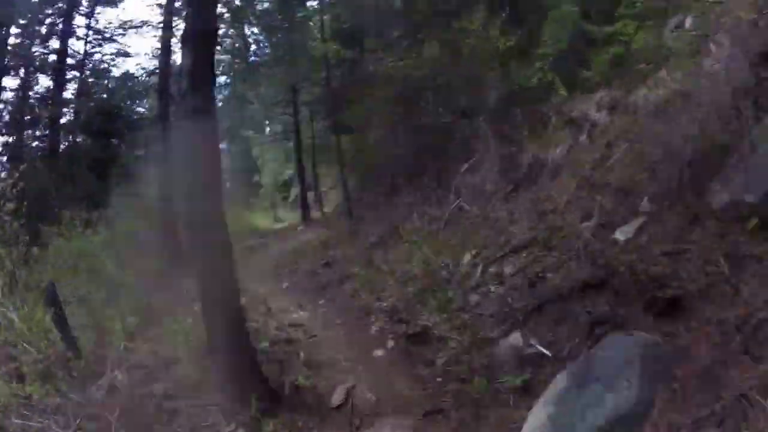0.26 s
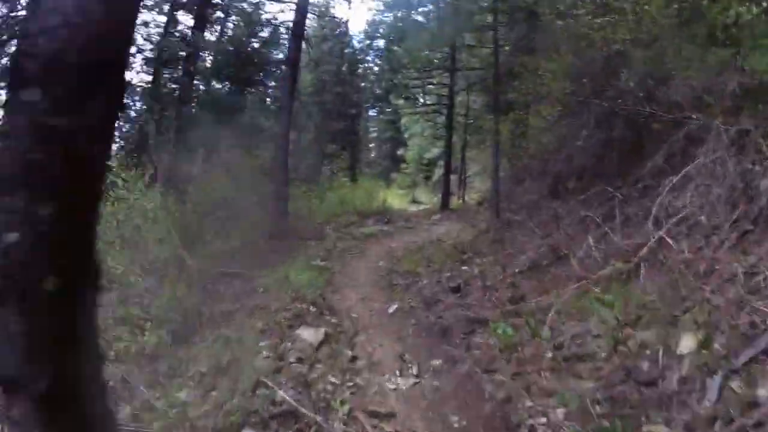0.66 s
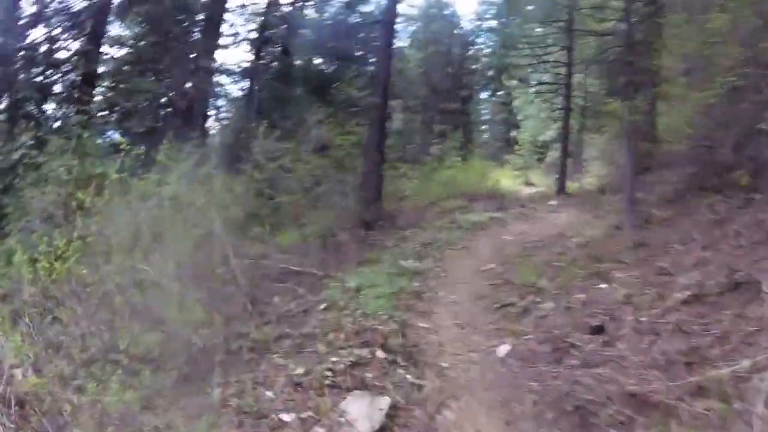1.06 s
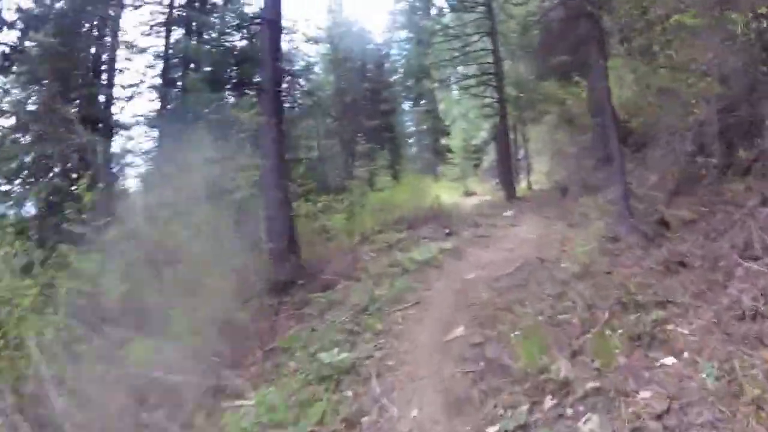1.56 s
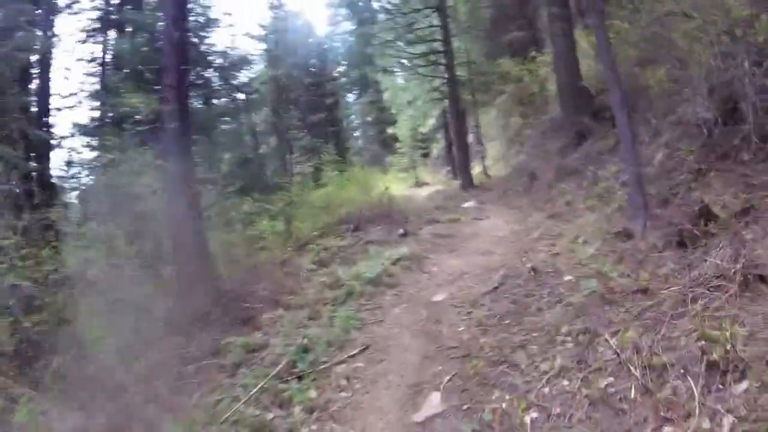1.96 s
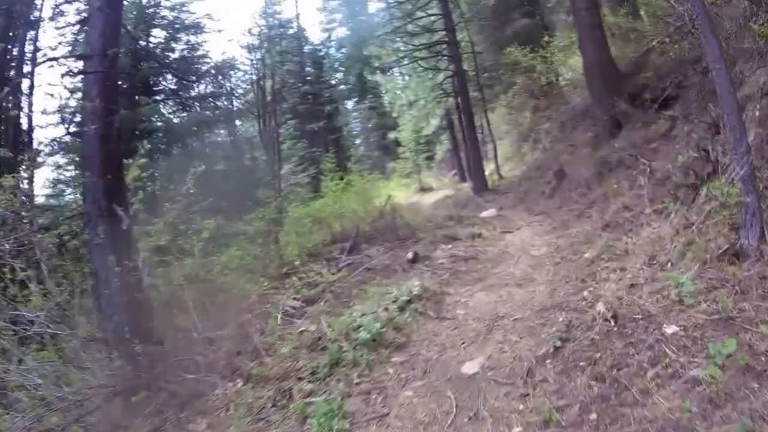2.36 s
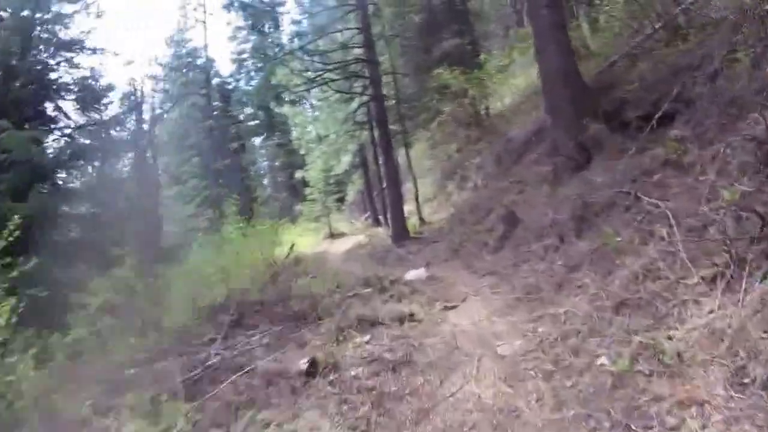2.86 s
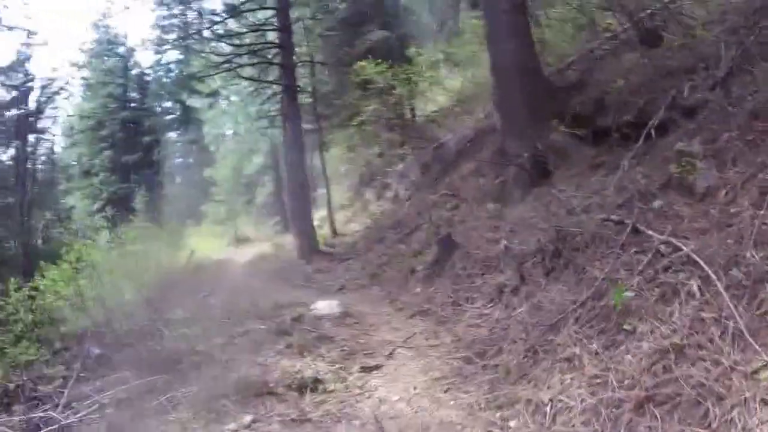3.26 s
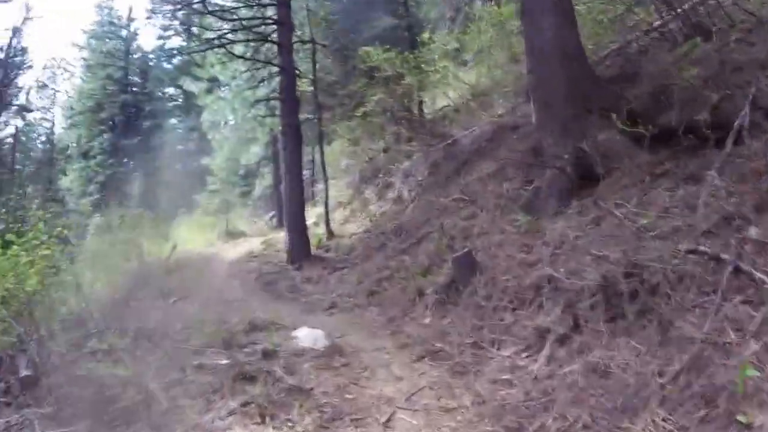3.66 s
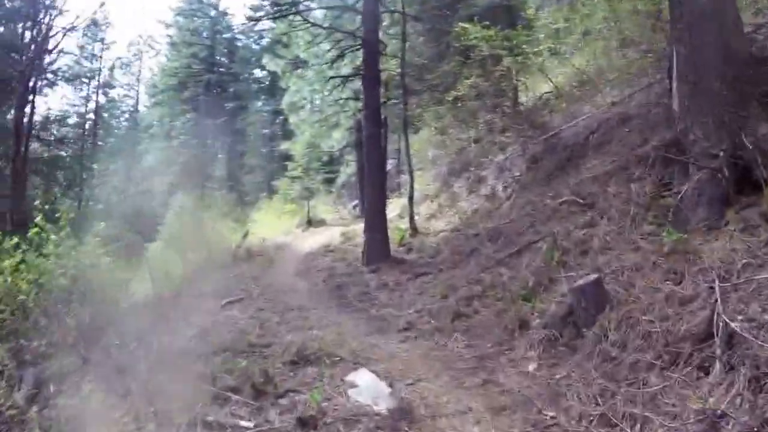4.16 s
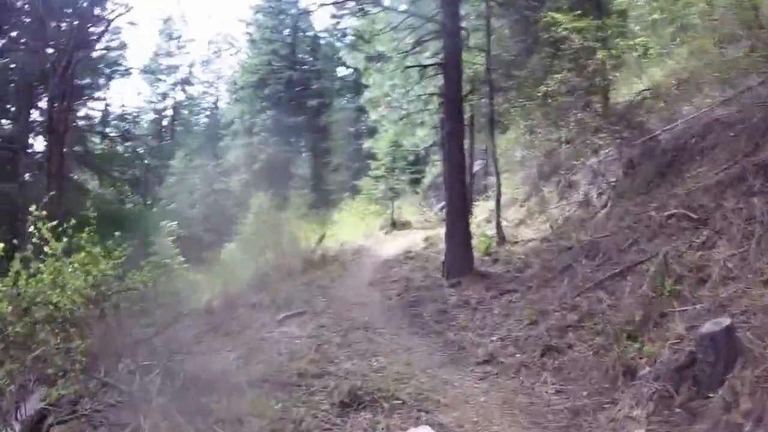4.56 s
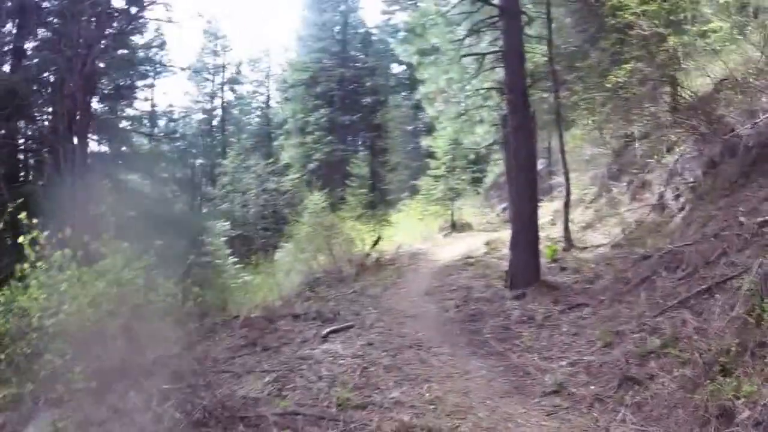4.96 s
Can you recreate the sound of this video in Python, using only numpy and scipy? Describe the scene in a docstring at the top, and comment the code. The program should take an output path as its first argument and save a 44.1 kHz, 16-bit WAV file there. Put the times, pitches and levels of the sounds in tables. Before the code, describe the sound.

A mountain bike races down rough dirt, heard from inside a sealed plastic camera case. Heavy low wheel thumps and rumble open the ride, then irregular hollow clacks and sharp ticks take over, crowding close together. Loose parts patter constantly between them. The sound is very close, dry and muffled on top, with the hardest knocks overloading the microphone.

```python
"""A rough forest trail, heard from a mountain bike by a camera's microphone inside a sealed plastic case.
Closest are the jolts on the case: bright ticks and a hollow shell ring, made by noise ringing resonances.
Loose parts patter on the case between them; farther off, tyre rumble (filtered noise) and
wheel thumps (short low swings) come up through the frame, under a faint treble hiss.
The case dulls the treble, and the hardest knocks overload the microphone."""
import sys
import numpy as np
from scipy import signal
from scipy.io import wavfile
from scipy.ndimage import uniform_filter1d

SR = 44100
rng = np.random.default_rng(int(sys.argv[2]) if len(sys.argv) > 2 else 0)


def bounce(signal):
    """Save signal as a 16-bit WAV file at the path given by the first command-line argument."""
    frames = np.transpose(np.atleast_2d(signal))
    limited = np.clip(frames, -1, 1)
    pcm = np.round(limited * 32767).astype(np.int16)
    wavfile.write(sys.argv[1], SR, pcm)


N = 229653  # length [samples]

# roughness along the trail: (time [s], rattle level [dB], rumble level [dB])
TRAIL_ROUGHNESS = [(0.0, -24, -11), (0.131, -35, -22), (.35, -23, -23), (0.901, -19, -25),
                   (1.351, -20.5, -26), (1.75, -18.5, -30.5), (2.602, -19.5, -28.5), (3.5, -18.5, -27.5),
                   (4.0, -19, -29), (4.45, -18.5, -34.5), (5.05, -17.5, -31), (5.21, -21, -28)]
# wheel strikes heard through the frame: (time [s], level [dB], pitch [Hz], top of the swing [cycles])
WHEEL_THUMPS = [(.004, -5.5, 86, .75), (0.069, -6, 85.2, 1.7), (0.085, -5, 188, 0.99),
                (0.101, -7.5, 87.5, 0.77), (.3, 0.5, 170, 0.39), (0.335, -4, 95, .34),
                (1.019, -12, 205, 1.5), (1.312, -18, 75, 1), (1.892, -9.5, 238, 0.68),
                (2.158, -22.5, 109, 0.84), (3.49, -16.5, 130, 1.8), (4.899, -13.5, 140, 0.8)]
# jolts on the case: (time [s], tap level [dB], shell ring level [dB], ring length scale [ms])
CASE_JOLTS = [(0.017, -34.5, 4.5, 3.2), (0.063, -10.5, -10.5, 5.4), (0.089, -7.5, 7, 3.3),
              (0.171, -21.5, -20, 4), (0.223, -9, -1.5, 9.8), (.290, -9.5, -5, 4), (.304, -8, 6.5, 3.7),
              (0.312, -16, -12, 8.4), (0.415, -10.5, -10, 10), (.442, -7.5, 2, 3.8),
              (0.48, -25.5, -13, 4.4), (0.498, -2.5, 0, 8.3), (.543, -6.5, -3.5, 8.4),
              (.627, -11, -2.5, 5.7), (.720, -10.5, 9, 2.86), (.762, 1, 2.5, 11.3), (.820, 0, 8.5, 6.1),
              (0.834, -4, 2, 7.6), (0.992, -5, -7, 5.4), (1.006, 3.5, 3, 17), (1.022, -1, 6.5, 7.2),
              (1.037, 1.5, 5.5, 8.6), (1.069, 0.5, 6, 4.5), (1.082, -21, -2.5, 7.7), (1.131, -5, 4, 6.9),
              (1.174, -20, 3, 2.3), (1.284, -6, 9, 2.35), (1.322, -6.5, 0.5, 10.5), (1.365, -2.5, 4, 7.7),
              (1.409, -7.5, -12, 3.5), (1.451, -6.5, 1, 4.5), (1.503, 1, 4, 9.1), (1.543, -13, -3, 14),
              (1.569, -6.5, 8, 3.9), (1.694, -7, -3.5, 5), (1.721, -8, -1, 13), (1.748, -1, 6.5, 7.1),
              (1.865, -5.5, -2, 5.6), (1.892, 0, 11.5, 6.9), (1.907, -2.5, 0, 5.3), (2.045, -3.5, 4, 4.2),
              (2.122, -14, -0.5, 5.5), (2.16, -0.5, 8.5, 5), (2.194, -5, 2.5, 5.2), (2.243, -9, -16, 3.3),
              (2.282, -6.5, -8, 3.9), (2.341, -1, 1.5, 3.1), (2.355, 2, 2.5, 7.9), (2.374, -6.5, -3, 7.1),
              (2.468, -2.5, 11, 7.3), (2.498, -5, 1, 3.7), (2.521, -5.5, -5, 15), (2.531, -10.5, 1, 5.1),
              (2.585, -9, 7.5, 3.7), (2.745, -0.5, -1, 8.5), (2.774, -2, 6, 6.7), (2.811, -7, 0, 7.3),
              (2.837, -5, -1.5, 3.7), (2.896, -5, -20, 2.9), (2.966, -11.5, -9, 3.7),
              (3.088, -9, -0.5, 9.5), (3.121, -7, -4, 8.3), (3.182, -9.5, -1, 1.9), (3.249, -5, 0, 3.5),
              (3.271, -3, -8, 7.1), (3.369, 0, 6, 4), (3.55, -6.5, -11, 7.5), (3.566, -1, -0.5, 9.6),
              (3.590, 3, 1.5, 12.5), (3.606, -0.5, 2, 8.5), (3.69, -3, 5, 3.2), (3.713, -0.5, 7, 7.7),
              (3.843, -8.5, -22, 3), (3.901, -9, -4.5, 7), (3.946, -18, -2.5, 4.5),
              (4.028, -9.5, -3.5, 19.6), (4.130, -5, 0, 5), (4.213, 1, 2, 8.6), (4.228, -1, -0.5, 3.9),
              (4.257, -5.5, -18, 5), (4.285, -7.5, -13, 3.9), (4.323, -10.5, 4.5, 6.5),
              (4.386, -13, -5, 11), (4.409, -11, -5.5, 5), (4.433, -3.5, 6.5, 3.3), (4.460, -4, -8.5, 5),
              (4.648, -14, -1, 4.7), (4.725, -11, -4, 11), (4.791, -3.5, 7.5, 7.4), (4.898, 2, 2.5, 2.3),
              (4.908, -26, 12, 1.8), (4.936, -4.5, 5, 3.5), (4.964, -3, -2, 4), (4.995, -3.5, -4, 5.7),
              (5.038, -6.5, -3, 4.4), (5.075, -4.5, .5, 10), (5.114, -5.5, -2, 7.8), (5.154, -5, 1.5, 20.6),
              (5.182, -9.5, 5.5, 4.7)]
# hollow low resonances of the case shell: (frequency [Hz], width [Hz], level [dB])
SHELL_MODES = [(268.7, 31.6, -9), (361.9, 48, 3), (390.9, 55, 2.5), (466.7, 54.2, 5), (516.7, 68, 1.5),
               (579, 77, -5), (814, 32, -15.5)]
# middle resonances of the case: (frequency [Hz], width [Hz], level [dB])
CLACK_MODES = [(832, 147, -7.5), (1251, 168, 3), (1386, 460, -1.5), (1638, 220, -1.5)]
# bright upper resonances of the case: (frequency [Hz], width [Hz], level [dB])
TICK_MODES = [(2040, 155, -2.5), (2265, 142, 3.5), (2712, 136, 4.5), (3410, 486, -7), (4250, 950, -18.5),
              (5800, 210, -28.5)]
# low resonances of the bike frame: (frequency [Hz], width [Hz], level [dB])
FRAME_MODES = [(82, 22, -6), (136.8, 11, -9.5), (215, 190, -21)]
# narrow bands of the treble hiss: (frequency [Hz], width [Hz], level [dB])
HISS_BANDS = [(4480, 330, -0.5), (5800, 350, 4.5)]

RATTLE_BRIGHT_DB, BRIGHT_PER_DB = 3, 0.37  # upper modes on a -19 dB stretch; rougher ground is brighter
SHELL_START_S = -.0008  # start of the shell's swell, from the jolt's time
TAP_START_S = -.001  # start of a tap, from its given time
TICK_SPREAD_DB = 4  # taps fall at random nearer the middle or the upper modes
THIN_DB = -20.5  # brief ticks of the highest modes alone, against their tap
REBOUND_DB, REBOUND_SPREAD_DB = -6.5, 3  # the camera shuffles around each tap
REBOUND_MS, REBOUND_SCATTER_MS = 5.5, 9
STRAY_COUNT, STRAY_DB, STRAY_SPREAD_DB = 70, 7.5, 3  # small stray taps, level above the rattle
CASE_HZ, BASS_CUT_HZ, TOP_HZ = 4000., 60., 15800  # treble limit of the case, then limits of the microphone


def undb(db):
    """Decibels to gain."""
    return 10 ** (np.asarray(db) / 20)


def ring(x, modes):
    """Sum of two-pole resonances, alternate signs so that valleys stay filled."""
    out = 0
    for k, (hz, width, db) in enumerate(modes):
        radius = np.exp(-np.pi * max(width, 5) / SR)
        angle = 2 * np.pi * hz / SR
        poles = [1, -2 * radius * np.cos(angle), radius * radius]
        mode = signal.lfilter([1, 0, -1], poles, x)
        out = out + (-1) ** k * undb(db) * (1 - radius) * mode
    return out


def unit(x):
    """Scale to rms 1."""
    return x / np.sqrt(np.mean(x ** 2))


def place(times, sounds):
    """Lay short sounds out at their times."""
    out = np.zeros(N + sounds.shape[1])
    for s, sound in zip(times, sounds):
        i = int(np.clip(s * SR, 0, N - 1))
        out[i:i + len(sound)] += sound
    return out[:N]


def grit(rate, spread_db, smear_ms):
    """Force envelope of random small impacts of unequal size, each a short scrape, over a steady rub."""
    size = np.minimum(rng.exponential(size=N), 1.9)
    hits = (rng.random(N) < rate / SR) * undb(spread_db * size)
    fade = np.exp(-1000 / (smear_ms * SR))
    scrapes = signal.lfilter([1], [1, -fade], hits)
    return uniform_filter1d(scrapes, size=88) + 0.45  # 2 ms smoothing, then the rub


def rattle(db, bright_db):
    """Loose parts patter on the case all the time; the same patter rings all its modes."""
    patter = grit(rate=260, spread_db=2.2, smear_ms=6.1) * rng.standard_normal(N)
    clack = undb(-14) * unit(ring(patter, CLACK_MODES))
    tick = undb(-18.5) * unit(ring(patter, TICK_MODES))
    shell = unit(ring(patter, SHELL_MODES))
    return undb(db) * (shell + undb(bright_db) * (clack + tick))


def rumble(db):
    """Tyre knobs on dirt shake the frame: broad low noise rings its modes."""
    shaking = ring(rng.standard_normal(N), [(117, 630, 0)])
    return undb(db) * unit(ring(shaking, FRAME_MODES))


def treble_hiss():
    """A faint steady hiss: noise through two narrow treble bands."""
    hiss = ring(rng.standard_normal(N), [(5200, 2500, 0)])
    return undb(-55) * unit(ring(hiss, HISS_BANDS))


def thumps():
    """A wheel strikes a root or stone: a short low swing that grows to its top and dies."""
    s, db, hz, top = np.transpose(WHEEL_THUMPS)[:, :, None]
    cycles = np.arange(8192) / SR * hz
    envelope = cycles / top * np.exp(1 - cycles / top)
    swing = np.sin(2 * np.pi * cycles) * envelope
    return place(s[:, 0], undb(db) * swing)


def blows(modes, rise, fall, length_ms, db, snap):
    """A first snap, then a rough contact force that swells and dies over its length, ring the modes."""
    ms = np.arange(4096) / SR * 1000
    age = ms / np.maximum(length_ms, .3)[:, None]
    envelope = (1 - np.exp(-age / rise)) * np.exp(-age ** fall)
    force = envelope * rng.standard_normal(age.shape)
    force[:, 0] = snap * np.sqrt(np.sum(force ** 2, axis=1))
    sound = ring(force, modes)
    peak = uniform_filter1d(np.abs(signal.hilbert(sound)), size=64).max(axis=1)
    return sound * (undb(db) / peak)[:, None]


def taps(s, db):
    """Each tap splits its energy between the middle and the upper modes; harder taps last longer."""
    tick_db, thin_db = TICK_SPREAD_DB * rng.standard_normal((len(s), 2)).T
    length_ms = 3.43 * undb(0.13 * db)
    clack = blows(CLACK_MODES, 0.28, 0.76, length_ms, db - tick_db / 2 - 6.0, snap=0.38)
    tick = blows(TICK_MODES, 0.42, 1.0, 0.95 * length_ms, db + tick_db / 2 - 11.0, snap=0.52)
    thin = blows(TICK_MODES[3:], 0.13, 0.87, 0.43 * length_ms, db + thin_db + THIN_DB, snap=0.32)
    return place(s + TAP_START_S, clack + tick + thin)


def chatter():
    """Each jolt's tap, a bounce close by that is weaker still for soft taps, and strays along the trail."""
    s, db, _, _ = np.transpose(CASE_JOLTS)
    late, size = rng.standard_normal((len(s), 2)).T
    bounce_s = s + (REBOUND_MS + REBOUND_SCATTER_MS * late) / 1000
    bounce_db = 1.5 * db + REBOUND_DB + REBOUND_SPREAD_DB * size
    when, rough_db, _ = np.transpose(TRAIL_ROUGHNESS)
    stray_s = rng.random(STRAY_COUNT) * N / SR
    stray_db = np.interp(stray_s, when, rough_db) + STRAY_DB
    stray_db = stray_db + STRAY_SPREAD_DB * rng.standard_normal(STRAY_COUNT)
    return taps(s, db) + taps(bounce_s, bounce_db) + taps(stray_s, stray_db)


def knocks():
    """The shell swells quickly, rings evenly while pressed and is damped as the mount lets go."""
    s, _, db, length_ms = np.transpose(CASE_JOLTS)
    tone = ring(rng.standard_normal((len(s), 6144)), SHELL_MODES)[:, 2048:]  # skip the build-up
    swing = np.abs(signal.hilbert(tone))
    even = tone / (swing + 0.74 * np.mean(swing))  # levels out the swings of the noise
    ms = np.arange(4096) / SR * 1000
    swell = 1 - np.exp(-(ms / 2.87) ** 2)
    damping = np.exp(-(ms / (2.22 * length_ms[:, None])) ** 2.32)
    return place(s + SHELL_START_S, undb(db)[:, None] * swell * damping * even)


def aftershake(jolts, fade_ms, share):
    """Hard jolts leave the loose parts shaking for a moment: a gain that follows them and fades."""
    fade = np.exp(-1000 / (fade_ms * SR))
    return 1 + share * signal.lfilter([1 - fade], [1, -fade], np.tanh(np.abs(jolts)))


def scene():
    """The sealed case dulls the treble of all that comes through it to the microphone."""
    when, rattle_db, rumble_db = np.transpose(TRAIL_ROUGHNESS)
    t = np.arange(N) / SR
    rattle_db = np.interp(t, when, rattle_db)
    rumble_db = np.interp(t, when, rumble_db)
    jolts = knocks() + chatter()
    bright_db = RATTLE_BRIGHT_DB + BRIGHT_PER_DB * (rattle_db + 19)
    loose = rattle(rattle_db, bright_db) * aftershake(jolts, fade_ms=6.6, share=1.4)
    through = jolts + thumps() + loose + rumble(rumble_db) + treble_hiss()
    case = signal.butter(4, CASE_HZ, fs=SR, output="sos")
    return signal.sosfilt(case, through)[None]


def record(dry):
    """The microphone's bass is cut; its input stage rounds, then clips the peaks; the top is cut last."""
    bass_cut = signal.butter(2, BASS_CUT_HZ, "high", fs=SR, output="sos")
    thin = signal.sosfilt(bass_cut, dry)
    knee = 9.3  # higher is a sharper bend into overload
    rounded = thin / (1 + np.abs(thin / 1.02) ** knee) ** (1 / knee)
    top_cut = signal.ellip(8, .2, 70, TOP_HZ, fs=SR, output="sos")
    return signal.sosfilt(top_cut, np.clip(rounded, -1, 1))


dry = scene()
out = record(dry)
bounce(out)
```